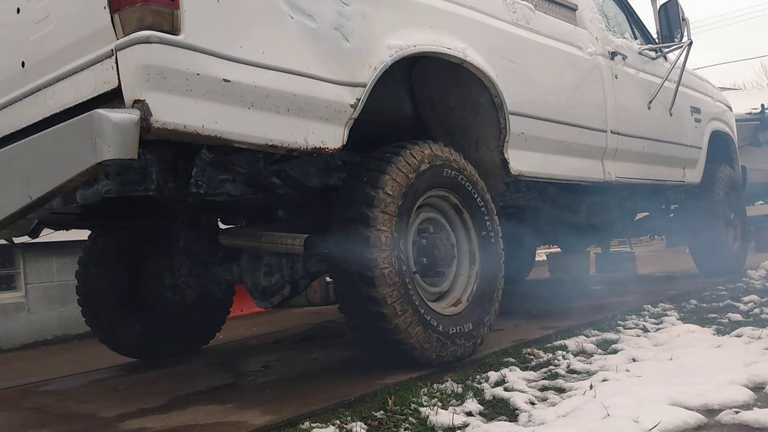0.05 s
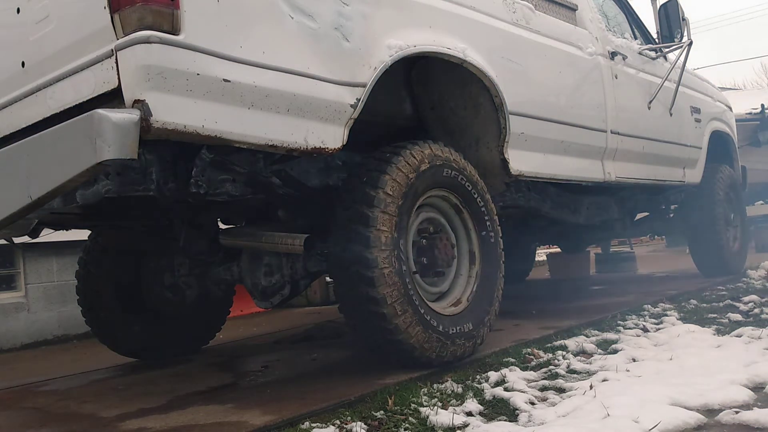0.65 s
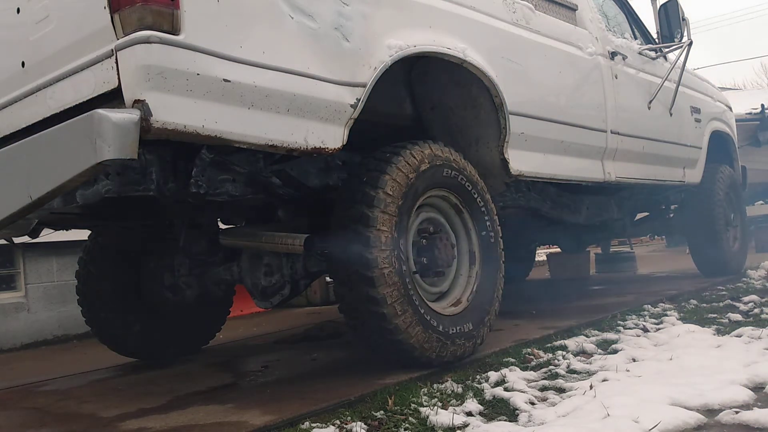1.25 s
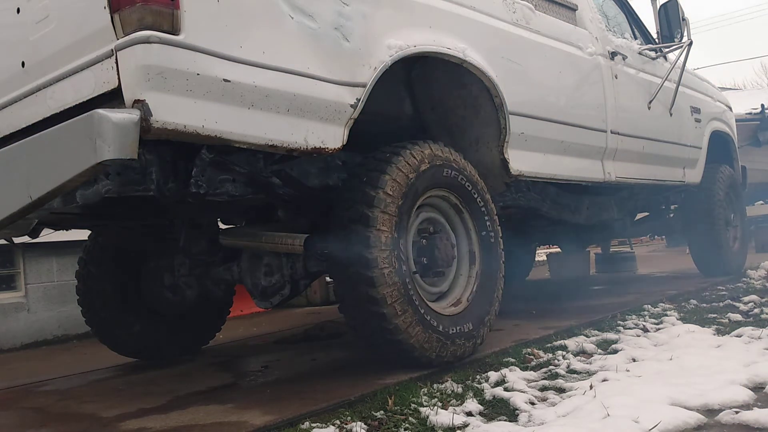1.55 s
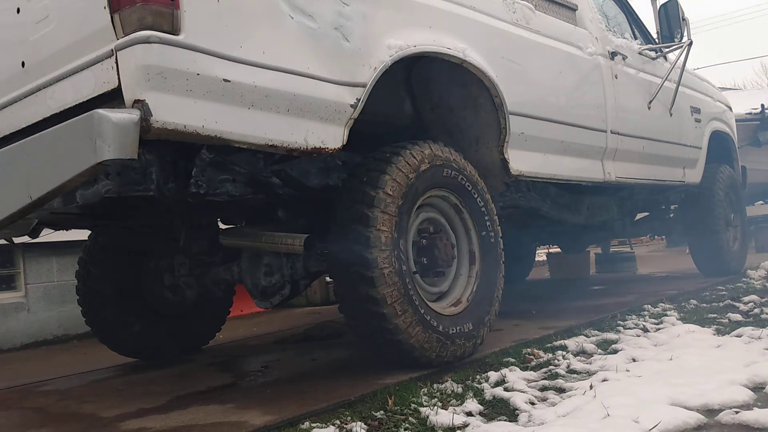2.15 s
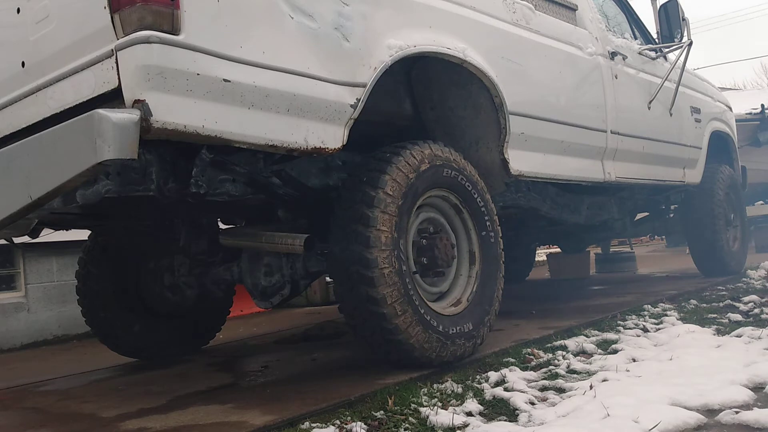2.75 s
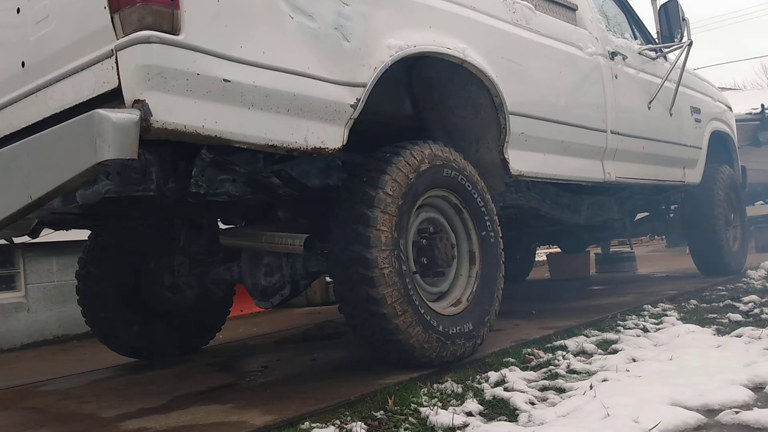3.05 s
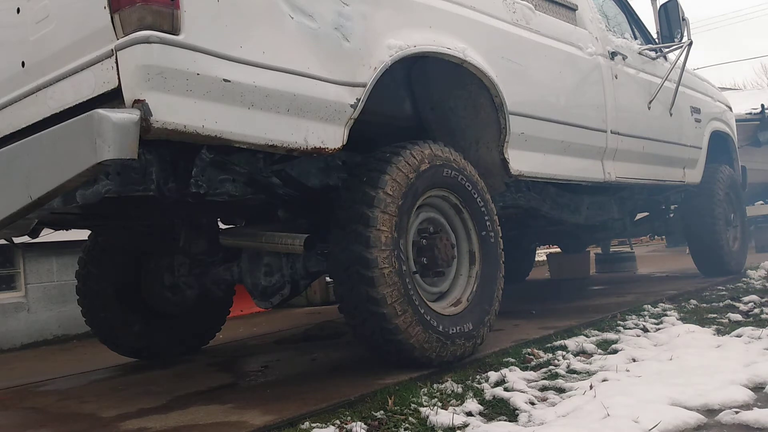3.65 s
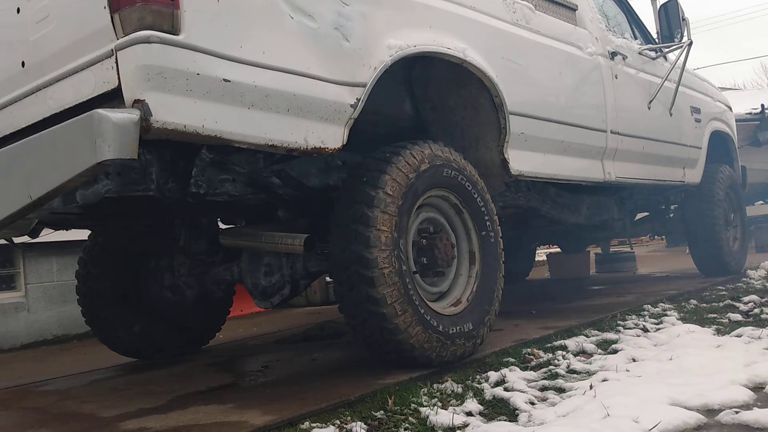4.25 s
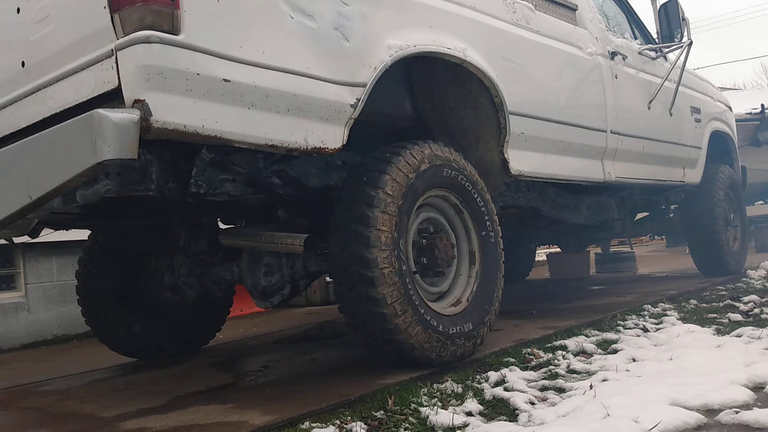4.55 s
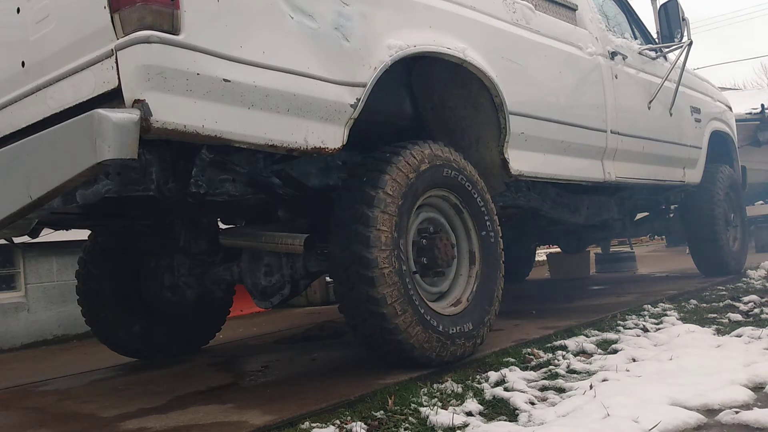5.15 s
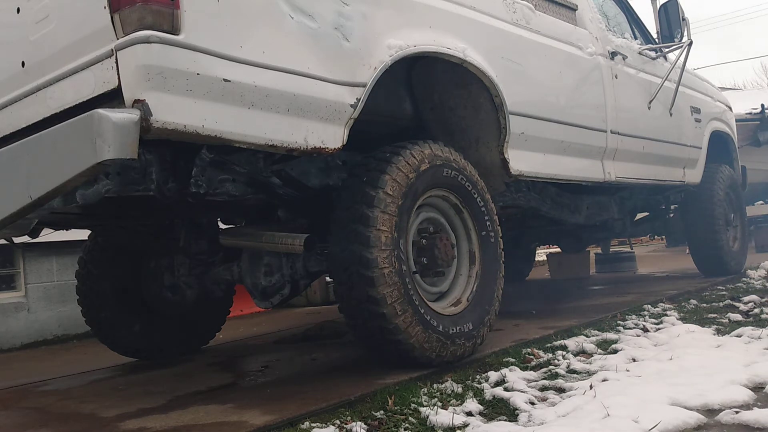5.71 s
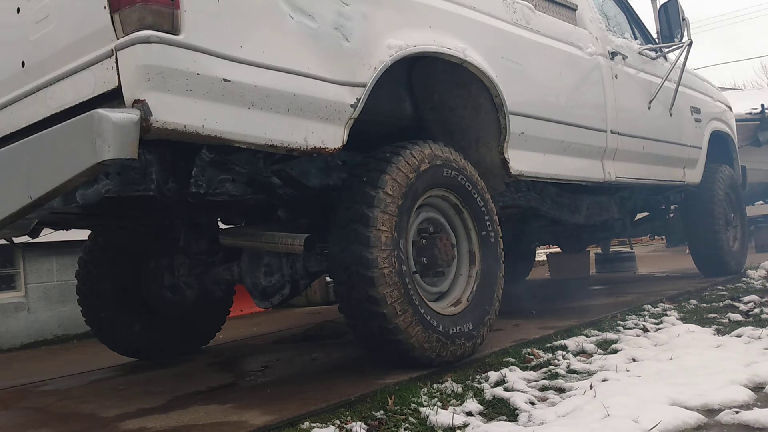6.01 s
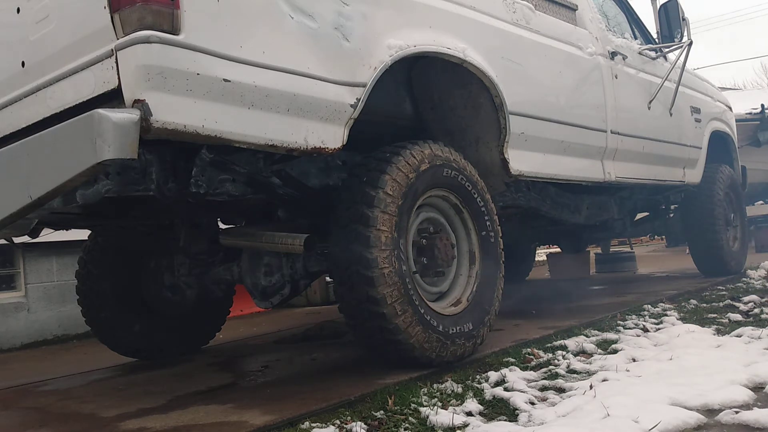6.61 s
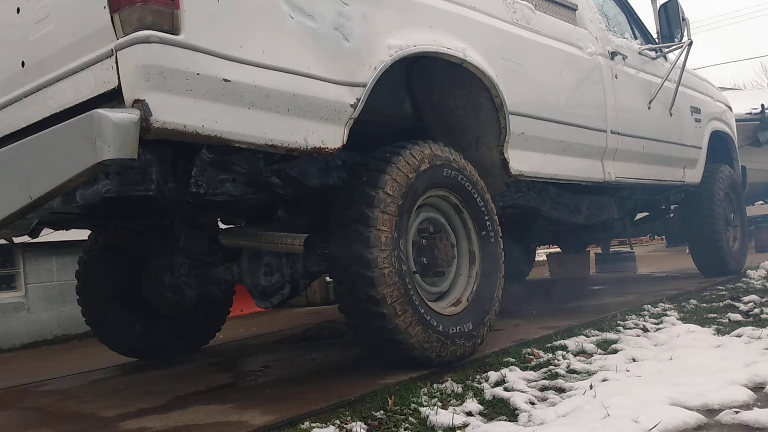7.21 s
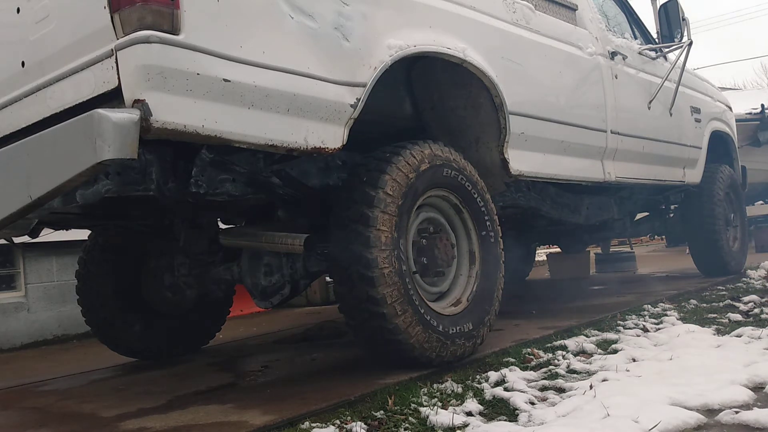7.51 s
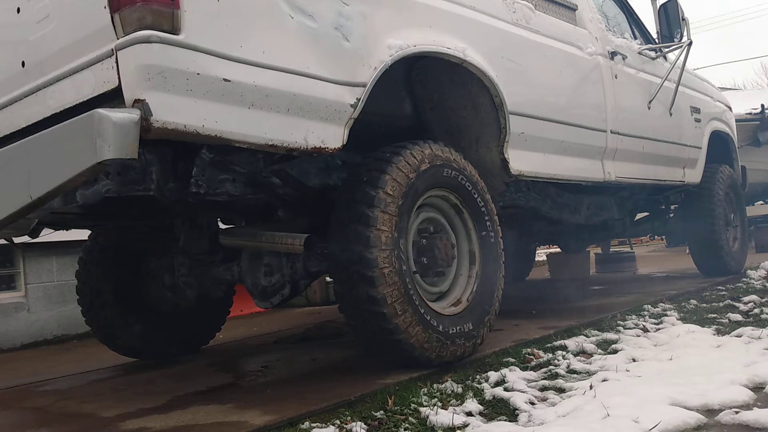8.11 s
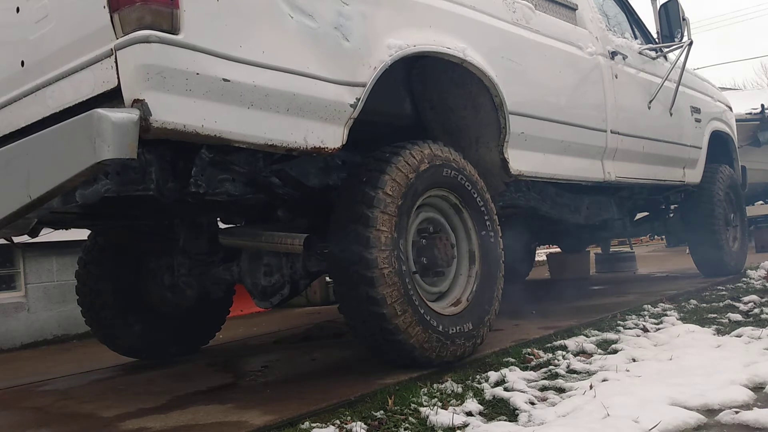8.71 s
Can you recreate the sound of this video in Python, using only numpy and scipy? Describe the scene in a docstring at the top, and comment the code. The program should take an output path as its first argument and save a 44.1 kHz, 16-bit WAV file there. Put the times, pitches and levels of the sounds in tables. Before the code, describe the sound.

Outdoors, with the microphones right beside the tailpipe, a cold diesel truck engine booms, barks and rattles. Its fast running drops to a rough, uneven lope, then sinks further and nearly dies before finding a slow, pulsing idle. Diesel knock, small ringing ticks and a light hiss follow the engine speed, while harder metallic knocks break through now and then.

```python
"""Cold diesel pickup at the tailpipe

Outdoors, a stereo pair beside the pipe. The V8 has just caught: it runs fast, lopes on misfiring
cylinders, sags almost to a stall and recovers to a slow, throbbing idle. Every firing booms and
barks in the exhaust, knocks in the block and spits a little hiss from the injectors."""
import sys
import numpy as np
from scipy import signal
from scipy.fft import rfft, irfft, next_fast_len
from scipy.io import wavfile
from scipy.ndimage import uniform_filter1d, map_coordinates

SR = 44100
rng = np.random.default_rng(int(sys.argv[2]) if len(sys.argv) > 2 else 0)


def store_pcm(level_fs):
    """Save levels as 16-bit WAV."""
    pcm = np.round(np.clip(level_fs, -1, 1) * 32767).astype(np.int16)
    wavfile.write(sys.argv[1], SR, np.atleast_2d(pcm).T)


N = 391166
TIME_S = np.arange(N) / SR
CYLINDERS = 8


def amp(db):
    """Decibels to gain."""
    return 10 ** (np.asarray(db) / 20)


def unit(x):
    """Scaled to rms 1."""
    return x / np.sqrt(np.mean(x ** 2) + 1e-20)


def even(x):
    """Rms 1 over every few engine cycles; the throb inside a cycle stays."""
    power = np.mean(np.atleast_2d(x) ** 2, axis=0)
    power = uniform_filter1d(uniform_filter1d(power, size=SR // 4), size=SR // 5)
    return x / np.sqrt(np.abs(power) + 1e-20)


def along(points, hz):
    """Interpolates (pitch_hz, value) points on a log axis."""
    pitches, values = np.transpose(points)
    return np.interp(np.log(hz + 1), np.log(pitches + 1), values)


def curve(points):
    """One value per sample from (time_s, value) points."""
    return np.interp(TIME_S, *np.transpose(points))


def wobble(knots_per_s):
    """A smooth random curve."""
    knots = rng.standard_normal(int(N * knots_per_s / SR) + 4)
    return map_coordinates(knots, [TIME_S * knots_per_s])


def filtered(x, response):
    """x times a complex response of frequency."""
    size = 2 * next_fast_len((N + SR) // 2)
    return irfft(rfft(x, size) * response(np.fft.rfftfreq(size, 1 / SR)), size)[..., :N]


def causal(db):
    """The response with this gain that rings only after a blow."""
    cepstrum = irfft(np.log(amp(db)))
    half = len(cepstrum) // 2
    cepstrum[1:half] *= 2
    cepstrum[half + 1:] = 0
    return np.exp(rfft(cepstrum))


def resonances(modes, f):
    """Response of (pitch_hz, width_hz, level_db) modes of alternating sign."""
    return sum((-1) ** k * amp(db) * 1j * f * width / (hz * hz - f * f + 1j * f * width)
               for k, (hz, width, db) in enumerate(modes))


def edge(f, corner_hz, kind, order):
    """Response of a high-pass or low-pass."""
    return signal.freqs(*signal.butter(order, corner_hz, kind, analog=True), f)[1]


def band(f, low_hz, high_hz, orders=(2, 2)):
    """Response of a high-pass followed by a low-pass."""
    return edge(f, low_hz, "high", orders[0]) * edge(f, high_hz, "low", orders[1])


def train(times, sizes):
    """Impulses at the given times."""
    return np.bincount(np.clip(np.round(times * SR).astype(int), 0, N), sizes, N + 1)[:N]


def fade(t60):
    """A decay of 60 dB in t60 seconds."""
    return amp(-60 * np.arange(int(t60 * SR) + 1) / (t60 * SR))


def bursts(times, sizes, t60):
    """A fresh pair of dying noises at every time."""
    power = signal.fftconvolve(train(times, sizes ** 2), fade(t60) ** 2)[:N]
    return np.sqrt(np.abs(power)) * rng.standard_normal((2, N))


# How alike the two microphones hear the truck: pitch_hz, likeness
MIC_LIKENESS = [(100, 0.98), (250, 0.92), (500, 0.87), (1000, 0.73), (2000, 0.85), (4000, 0.36),
                (8000, 0.041), (14000, 0.084)]
def spread(pair):
    """Direct sound and scatter from ground and body, mixed for the left and right microphones."""
    angle = lambda hz: np.arccos(np.clip(along(MIC_LIKENESS, hz), -1, 1)) / 2
    mid, side = filtered(pair, lambda hz: np.array([np.cos(angle(hz)), np.sin(angle(hz))]))
    return np.array([mid + side, mid - side])


# Engine speed: time_s, firings_per_s
SPEED = [(0, 72.27), (.7, 71.8), (.95, 70.46), (1.17, 73.6), (1.3, 65.8), (1.43, 57.5), (1.8, 59.93),
         (3.7, 59.37), (4, 55.39), (4.3, 56.14), (4.6, 51.69), (4.95, 54.48), (5.07, 54), (5.17, 37.25),
         (5.45, 36), (5.7, 39.84), (6.05, 40.61), (6.35, 36.74), (6.8, 38.51), (8.1, 38.29), (8.87, 36.67)]
def firings(lead_firings=1.06):
    """Time, cylinder and interval of every firing as the crank turns."""
    rate = curve(SPEED)
    turned = np.cumsum(rate) / SR + lead_firings
    count = np.arange(1, int(turned[-1]) + 1)
    samples = np.searchsorted(turned, count)
    return samples / SR, count % CYLINDERS, 1 / rate[samples]


# How the engine runs: time_s, state (0 fast, 1 loping, 2 sagging, 3 idling)
STATE = [(1.17, 0), (1.4, 1), (3.7, 1), (4, 1.5), (4.25, 1.1), (4.45, 2), (4.95, 2), (5.17, 3)]
def by_state(table):
    """One curve for each column of a table with a row per state."""
    state = curve(STATE)
    return [np.interp(state, np.arange(len(table)), column) for column in np.transpose(table)]


def by_cylinder(table, times, cylinder):
    """Each firing's value from its cylinder's column, blended between states."""
    state = np.interp(times, *np.transpose(STATE))
    return map_coordinates(np.array(table, float), [state, cylinder], order=1, mode="nearest")


# The governor's corrections: peak_s, width_s, extra_fuel
SURGES = [(1.38, 0.23, -0.16), (1.68, 0.13, 0.14), (4.64, 0.1, 0.28), (5.37, 0.1, -0.65),
          (5.76, 0.32, 0.24)]
def fuel(coast_firings_per_s2=210, governor_s=0.037):
    """Fuel against steady running (-1 = shut off): cut as the engine slows, corrected in surges."""
    slowing = np.maximum(-np.gradient(curve(SPEED)) * SR, 0)
    lag = governor_s * SR
    cut = signal.lfilter([1], [lag, 1 - lag], np.tanh(slowing / coast_firings_per_s2))
    surges = sum(extra * np.exp(-((TIME_S - peak_s) / width_s) ** 2) for peak_s, width_s, extra in SURGES)
    return surges - cut


# Base balance beside the pipe, a row per state: boom_db, bark_db, clatter_db, hiss_db
LEVELS = [(-18.5, -30.5, -27.5, -46), (-21.5, -31, -25.5, -47), (-28, -33.5, -26, -48),
          (-25.5, -34, -27.5, -53)]
# What a full swing of fuel adds: boom_db, bark_db, clatter_db, hiss_db
FUEL_DB = (4.3, 5.3, 5.6, 6.7)
# The boom's dip at the near stall: weakest_s, depth_db, half_width_s
STALL = (5.36, 3.1, 0.25)
# Trims, a row per state: muffler_db, hoot_db (on the bark), sump_db, injector_db (on the clatter)
TRIMS = [(-0.68, -0.5, -14, -6.5), (-0.64, -6, -13, -7.5), (1, -1.5, -8, -10.5), (-1, -4, -6, -14)]
def levels():
    """Curves in dB, set by the running state and louder with more fuel."""
    burning = fuel()
    boom, bark, clatter, hiss = [base + swing * burning for base, swing in zip(by_state(LEVELS), FUEL_DB)]
    weakest_s, depth_db, half_width_s = STALL
    boom -= depth_db * np.exp(-((TIME_S - weakest_s) / half_width_s) ** 4)
    muffler, hoot, sump, injector = by_state(TRIMS)
    return dict(boom=boom, bark=bark + muffler, hoot=bark + hoot, hiss=hiss,
                block=clatter, sump=clatter + sump, clack=clatter + injector)


# Colour of the open air at the microphones: pitch_hz, level_db
AIR = [(10, 8), (30, 6), (60, -14), (160, 24), (400, -30), (2000, -18), (15000, -39)]
def air(level_db=-47):
    """The low, even rush of air around the running truck."""
    rush = filtered(rng.standard_normal((2, N)), lambda hz: amp(along(AIR, hz)))
    return amp(level_db) * unit(spread(rush))


# Colour of spray, ticks and sizzle: pitch_hz, level_db
HISS = [(2000, -10.5), (5000, 4.5), (7500, -2.5), (10500, -2.5), (13500, -2.5), (15500, -7)]
def hissing(pair):
    """Noise coloured to a bright hiss."""
    return filtered(pair, lambda hz: amp(along(HISS, hz)))


def valves(times, interval, level_db=-54, delay_firings=0.9, scatter_db=9):
    """Valves seat between the firings with small, bright ticks of uneven strength."""
    timing, strength = rng.standard_normal((len(times), 2)).T
    seated = times + interval * (delay_firings + 0.06 * timing)
    ticks = bursts(seated, amp(scatter_db * np.tanh(strength)), t60=0.037)
    return amp(level_db) * unit(spread(hissing(ticks)))


# Metal parts that ring once a cycle: place_firings, pitch_hz, fast_db, loping_db, idling_db
PINGS = [(.5, 977, -36, -32, -31), (1.101, 2410, -23, -26, -26), (1.05, 4820, -48, -42, -43),
         (2.0, 1272, -25, -25.5, -31), (2.9, 2024, -45, -29, -31), (3.05, 3080, -35, -34.5, -44),
         (4.148, 1918, -45, -41, -24), (4.702, 1326, -26, -29.5, -30), (5.601, 3410, -30, -32.5, -34),
         (5.799, 3900, -45, -33.5, -41), (6.098, 2333, -27, -23.5, -44), (6.748, 4580, -36, -36, -52),
         (6.849, 4234, -46, -33, -53), (7.099, 969, -30, -25.5, -26), (7.2, 1727, -38, -38, -27.5),
         (7.85, 3340, -42, -34, -33.5)]
def pings(times, cylinder, interval, level_db=-1, t60=0.17, scatter_db=0.64, detune=0.0059):
    """Injector lines and rocker gear are struck in turn; each rings with its own short note."""
    t = np.arange(SR // 4) / SR
    state = np.interp(times, *np.transpose(STATE))
    fuel_db = FUEL_DB[2] * np.interp(times, TIME_S, fuel())
    out = np.zeros((2, N + SR))
    for place, hz, fast_db, loping_db, idling_db in PINGS:
        db = np.interp(state, np.arange(4), [fast_db, loping_db, loping_db, idling_db]) + fuel_db
        attack = np.minimum(t * hz / 2, 1)
        for k in np.flatnonzero(cylinder == int(place) % CYLINDERS):
            strength, pitch = rng.standard_normal(2)
            ring = np.sin(2 * np.pi * (hz * (1 + detune * pitch) * t + rng.random((2, 1))))
            decay = amp(db[k] + scatter_db * strength - 60 * t / t60)
            start = int((times[k] + place % 1 * interval[k]) * SR)
            out[:, start:start + len(t)] += attack * decay * ring
    return amp(level_db) * spread(out[:, :N])


# How harshly the fuel lights, a row per state, a column per cylinder: level_db
HARSHNESS = [(3.6, .5, 1.5, -0.5, 0, 3.5, -2, .5), (2.3, -0.8, -4, -6, -4.5, -3, 0.5, 2),
             (3.6, -0.64, -1.5, -6, -1, -0.5, -2, 2.2), (5.6, 2.7, 1.5, 3, 4, 4.8, 3.5, 4.3)]
def blow_sizes(times, cylinder, contrast, offset_db):
    """Cylinders that light more harshly strike harder."""
    return amp(contrast * by_cylinder(HARSHNESS, times, cylinder) + offset_db)


def cylinder_knocks(times, cylinder, sizes, t60):
    """Each cylinder strikes the block at its own place, so it rings the same way every cycle."""
    decay = fade(t60)
    rings = rng.standard_normal((len(decay), CYLINDERS, 2)).T * decay
    out = 0
    for c in range(CYLINDERS):
        strikes = train(times, sizes * (cylinder == c))
        out += signal.oaconvolve(strikes[None], rings[:, c], axes=1)[:, :N]
    return unit(out)


# Colour of an injector's clack: pitch_hz, level_db
INJECTOR = [(1200, -31), (2000, 1), (2400, 5), (2900, -4.5), (3500, 1), (4500, -5), (5200, -12),
            (6300, -14), (8000, -39), (15000, -30)]
def injector_ring(pair):
    """Blows coloured by the injectors' metal."""
    return spread(filtered(pair, lambda hz: causal(along(INJECTOR, hz))))


def injectors(times, cylinder, interval, db, scatter_db=3.0, jitter_s=0.00005, steady_spray=0.67):
    """Injectors clack open and shut; the fuel spray hisses with them."""
    strength, shut_timing, shut_strength, timing = rng.standard_normal((len(times), 4)).T
    sizes = blow_sizes(times, cylinder, contrast=1.43, offset_db=scatter_db * strength)
    shut_times = times + interval * (0.41 + 0.11 * shut_timing)
    shut_sizes = sizes * amp(-2 + 1.9 * shut_strength)
    opening = cylinder_knocks(times + jitter_s * timing, cylinder, sizes, t60=0.1)
    shutting = unit(bursts(shut_times, shut_sizes, t60=0.25))
    clack = even(injector_ring(opening + shutting))
    spray = unit(bursts(times, sizes, t60=0.43) + bursts(shut_times, shut_sizes, t60=0.024))
    spray += steady_spray * rng.standard_normal((2, N))
    hiss = even(spread(hissing(spray)))
    return amp(db["clack"] + 1) * clack + amp(db["hiss"] + 5.5) * hiss


# Broad colour of the engine's iron: pitch_hz, level_db
IRON = [(250, -43.5), (450, -0.5), (700, -8.5), (1000, -7), (1400, 1), (2000, -3), (2600, -4.5),
        (3200, -10), (4200, -16.5), (5200, -24), (6300, -27.5), (8000, -43), (15000, -53)]
# Block, sump and body panels ringing over that colour: pitch_hz, width_hz, level_db
BLOCK_MODES = [(670, 90, -5.5), (945, 44, 2), (1184, 60, 4.5), (1260, 200, 1.5), (1440, 154, -8.5),
               (1518, 34, 4.5), (1600, 15, 6), (1723, 21, 3.5), (1870, 30, 5.5), (2540, 28, 5),
               (2690, 300, -1.5)]
def iron(pair):
    """Blows coloured by the engine block and the panels around it."""
    peaks = lambda f: sum(db / (1 + (2 * (f - hz) / width) ** 2) for hz, width, db in BLOCK_MODES)
    return spread(filtered(pair, lambda f: causal(along(IRON, f) + peaks(f))))


# Oil sump resonances: pitch_hz, width_hz, level_db
SUMP_MODES = [(781, 56, -8), (835, 10, -2.5), (949.4, 43, 1), (1000, 51, 0.5), (1114, 26, -2.5)]
def block(times, cylinder, interval, db, scatter_db=1.97, jitter_s=0.00005, slap_db=-2, waver_db=0.37):
    """Diesel knock at every firing and piston slap in between ring the block and the sump."""
    strength, slap_timing, slap_strength, timing = rng.standard_normal((len(times), 4)).T
    sizes = blow_sizes(times, cylinder, contrast=0.46, offset_db=scatter_db * strength)
    knocks = cylinder_knocks(times + jitter_s * timing, cylinder, sizes, t60=0.16)
    slap_times = times + interval * (0.5 + 0.0094 * slap_timing)
    slaps = cylinder_knocks(slap_times, cylinder, sizes * amp(2.2 * slap_strength), t60=0.15)
    rattle = 0.57 * unit(bursts(times, sizes, t60=0.16))  # loose parts, never twice alike
    whirr = 0.76 * rng.standard_normal((2, N))  # gears and belts
    blows = knocks + amp(slap_db) * slaps + rattle + whirr
    sump = filtered(blows, lambda f: resonances(SUMP_MODES, f) * band(f, 510, 1070))
    clatter = amp(db["block"] + 1.5) * even(iron(blows)) + amp(db["sump"]) * even(spread(sump))
    return clatter * amp(-waver_db * wobble(17))


# The hardest knocks: start_s, level_db
SLAMS = [(1.7306, -10), (1.967, -8), (2.519, -7), (2.645, -14), (2.805, -7.5), (3.447, -5.5), (3.991, -3.5),
         (4.452, -10), (4.6, -12), (4.689, -4.5), (4.8958, -4.5), (5.442, -9.5), (5.658, -9), (5.858, -8.5),
         (6.045, -8), (6.4756, -9), (6.699, -8.5), (7.108, -5.5)]
def slams(crack_db=-5, shake_db=-6, ring_db=-13, sizzle_db=-30):
    """Now and then late fuel lights all at once: a crack, then loose metal shakes and rings."""
    times, db = np.transpose(SLAMS)
    crack = bursts(times, amp(db + crack_db), t60=0.03)
    shake = bursts(times, amp(db + shake_db), t60=0.27)
    ring = bursts(times, amp(db + ring_db), t60=0.47)
    sizzle = bursts(times, amp(db + sizzle_db), t60=0.19)
    return iron(crack + shake) + injector_ring(ring) + hissing(sizzle)


# Clean engine tones: firing_rate_multiple, fast_db, loping_db, sagging_db, idling_db
ENGINE_TONES = [(2, -30.5, -41.5, -53, -67), (2.624, -34.5, -55, -52, -53), (3.75, -51, -40.5, -42, -62)]
def engine_tones(waver_db=3.2):
    """A few clean engine tones hum at multiples of the firing rate and follow the crank."""
    turned = np.cumsum(curve(SPEED)) / SR
    tones = 0
    for multiple, *state_db in ENGINE_TONES:
        db, = by_state(np.array(state_db)[:, None])
        tones += amp(db + waver_db * wobble(7)) * np.cos(2 * np.pi * multiple * turned)
    return np.sqrt(2) * tones * amp(FUEL_DB[0] * fuel())


# The exhaust's throb, a row per state: hardest_cylinder, bark_swing_db, hoot_swing_db
LOPE = [(7.65, -4, 10), (6.5, 1.5, 15.5), (6, 1.5, 22), (6.72, 1.5, 14)]
def lope(times, cylinder, bark_accent=0.3, hoot_accent=0.18):
    """Bark and hoot in dB at each firing: they swell once a cycle, as one cylinder blows hardest."""
    hardest, bark_swing_db, hoot_swing_db = np.transpose(LOPE)[:, :, None]
    away = (np.arange(CYLINDERS) - hardest + CYLINDERS / 2) % CYLINDERS - CYLINDERS / 2
    swell = np.cos(2 * np.pi * away / CYLINDERS)
    spike = np.maximum(1 - abs(away), 0)
    return (by_cylinder(bark_swing_db * (swell + bark_accent * spike), times, cylinder),
            by_cylinder(hoot_swing_db * (swell + hoot_accent * spike), times, cylinder))


def fronts(times, db, gas):
    """Each puff's sharp front arrives by the direct path and trails a short rush of gas."""
    direct = np.array([[1], [0]])
    return direct * unit(train(times, amp(db))) + gas * unit(bursts(times, amp(db), t60=0.073))


# The open end, beside the microphones, a row per state: pitch_hz, width_hz
TAILPIPE_NOTES = [(291, 104), (328, 157), (328, 36), (334.4, 120)]
def tailpipe(pair):
    """The pipe's end hoots with a hollow note that shifts from state to state."""
    shares = by_state(np.eye(len(TAILPIPE_NOTES)))
    note = lambda hz, width: filtered(pair, lambda f: resonances([(hz, width, 0)], f) ** 2)
    return spread(sum(share * unit(note(*row)) for share, row in zip(shares, TAILPIPE_NOTES)))


# Muffler and tailpipe resonances: pitch_hz, width_hz, level_db
MUFFLER_MODES = [(231, 34, 1), (304.2, 39, -1), (368.5, 27, 0), (452.7, 9.7, -6), (557, 46, -11.5),
                 (598, 92, -4)]
def muffler(pair):
    """Sharp fronts ring the muffler with a bark."""
    response = lambda f: resonances(MUFFLER_MODES, f) * band(f, 207, 547, orders=(2, 4))
    return spread(filtered(pair, response))


# Exhaust pipe resonances: pitch_hz, width_hz, level_db
PIPE_MODES = [(65.4, 28, 0.5), (81.2, 19, 6.5), (125, 5, -4.5), (139.4, 6.1, -1.5), (193.5, 20.6, -10.5),
              (219.6, 14.4, -10), (105, 4, -11.4)]
def pipe(puffs):
    """Puffs boom in the low modes of the long pipe."""
    bass = lambda f: edge(f, 53.5, "high", order=4) * abs(edge(f, 480, "low", order=2))
    return filtered(puffs, lambda f: resonances(PIPE_MODES, f) * bass(f))


# Exhaust puffs, a row per state, a column per cylinder in firing order: size (small = misfire)
PUFF_SIZES = [(2.22, 0.81, 1.09, 1.86, 1.15, 1.28, 0.85, 0.82),
              (0.88, 0.6, 0.98, 1.93, 0.41, 0.67, 0.78, 0.68),
              (0.71, 0.39, 1.04, 1.56, 1.41, 0.98, 1.07, 0.88),
              (0.83, 1.26, 0.7, 0.68, 1.07, 0.56, 1.55, 1.04)]
# Their timing, shifted by the manifold and the uneven crank, same layout: delay_s
PUFF_DELAYS = [(0.0025, -0.0033, -0.0009, 0.0023, -0.0025, 0.0022, -0.0013, -0.0003),
               (0.0005, -0.0012, -0.0001, 0.0003, 0.0007, 0.0001, 0.0012, 0.0002),
               (0.0005, -0.0001, 0.0016, 0.0022, -0.0006, -0.0013, 0.0013, 0.0007),
               (-0.0001, 0.0017, -0.0008, -0.0007, 0.0003, 0.0009, 0.0005, -0.001)]
def exhaust(times, cylinder, db, jitter_s=0.00012, puff_scatter_db=0.8, front_scatter_db=1.9):
    """Closest to the microphones: uneven puffs boom in the pipe, bark in the muffler, hoot at the end."""
    timing, puff_strength, bark_strength, hoot_strength = rng.standard_normal((len(times), 4)).T
    puff_times = times + by_cylinder(PUFF_DELAYS, times, cylinder) + jitter_s * timing
    sizes = by_cylinder(PUFF_SIZES, times, cylinder) * amp(puff_scatter_db * puff_strength)
    bark_db, hoot_db = lope(times, cylinder)
    boom = pipe(train(puff_times, sizes))
    bark = muffler(fronts(puff_times, bark_db + front_scatter_db * bark_strength, gas=1.0))
    hoot = tailpipe(fronts(times, hoot_db + front_scatter_db * hoot_strength, gas=0.53))
    return amp(db["boom"] - 0.5) * even(boom) + amp(db["bark"]) * even(bark) + amp(db["hoot"]) * even(hoot)


def already_running(x):
    """Earlier firings ring from the first moment, just as they do one cycle later."""
    cycle = int(SR * CYLINDERS / SPEED[0][1])
    blend = np.sqrt(np.clip(np.arange(cycle) / (cycle / 4) - 1, 0, 1))
    head = blend * x[:, :cycle] + (1 - blend) * x[:, cycle:2 * cycle]
    return np.hstack([head, x[:, cycle:]])


def scene():
    """One crankshaft and one fuel supply drive exhaust, block and injectors in the open air."""
    times, cylinder, interval = firings()
    db = levels()
    engine = exhaust(times, cylinder, db)
    engine += block(times, cylinder, interval, db)
    engine += injectors(times, cylinder, interval, db)
    engine += valves(times, interval)
    engine += pings(times, cylinder, interval)
    return already_running(engine) + engine_tones() + slams() + air()


# Balance between the microphones: pitch_hz, left_minus_right_db
MIC_BALANCE = [(60, 0.5), (110, 1.5), (200, 1.5), (380, 0.0), (700, 1.5), (1290, 0.5), (2380, 1), (4400, 0),
               (8120, 0), (15000, 3.5)]
def record(dry, lag_s=0.00011, top_hz=15750):
    """A closely spaced pair beside the tailpipe; the truck reaches the right microphone first."""
    sides = np.array([[0.5], [-0.5]])
    delay = lambda hz: np.exp(-2j * np.pi * hz * sides * lag_s)
    mics = filtered(dry, lambda hz: amp(sides * along(MIC_BALANCE, hz)) * delay(hz))
    return filtered(mics, lambda hz: hz < top_hz)


dry = scene()
out = record(dry)
store_pcm(out)
```